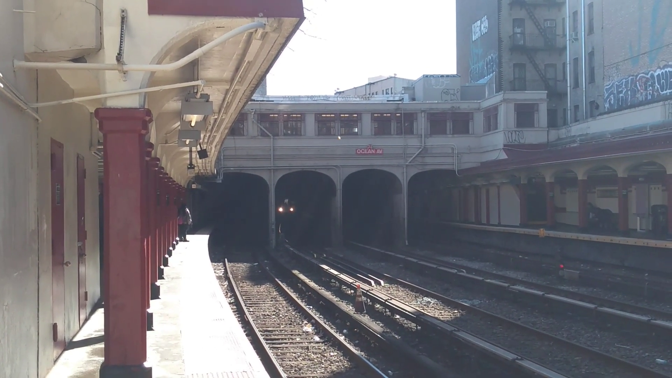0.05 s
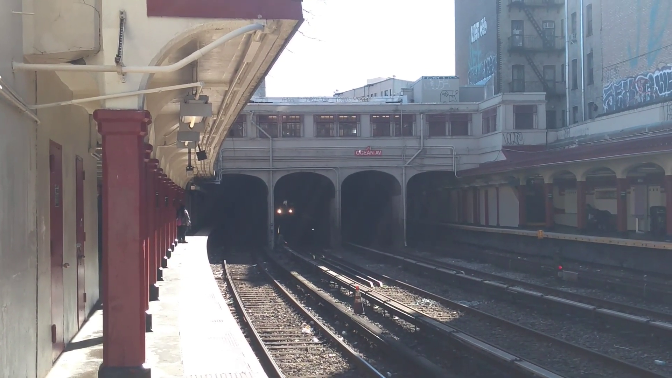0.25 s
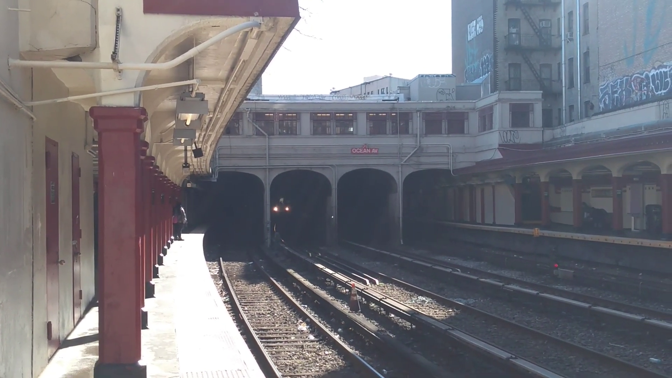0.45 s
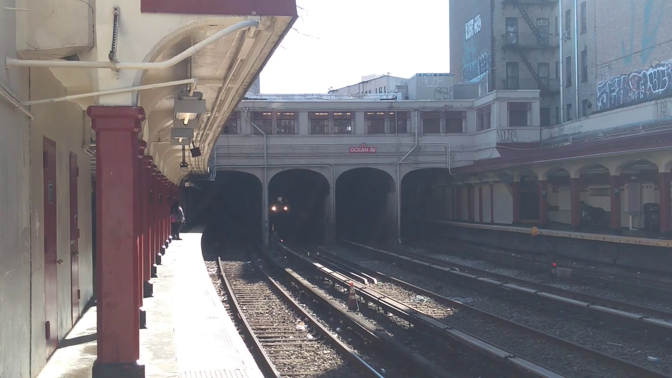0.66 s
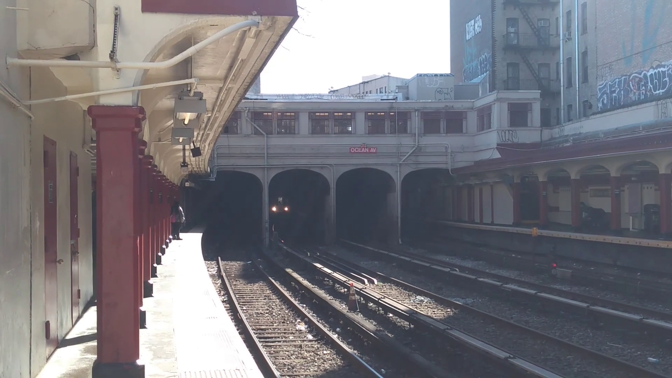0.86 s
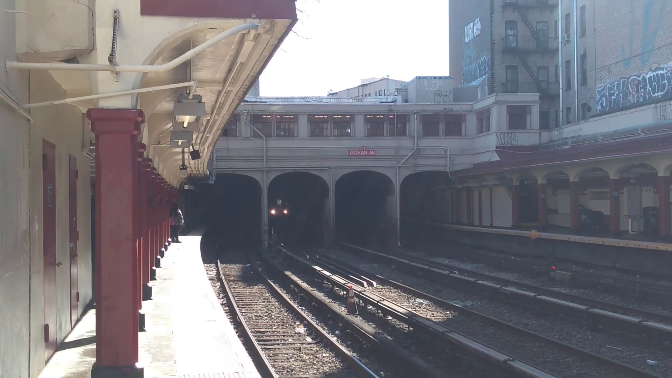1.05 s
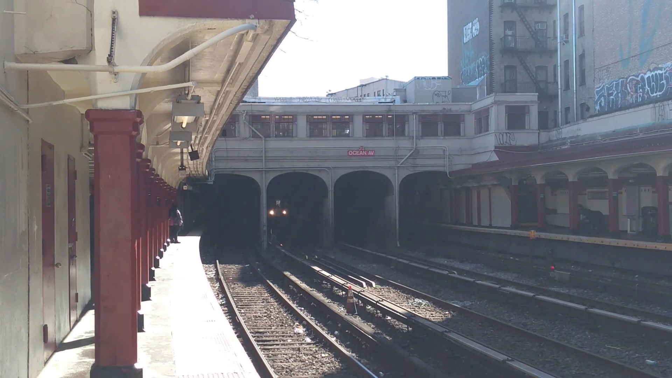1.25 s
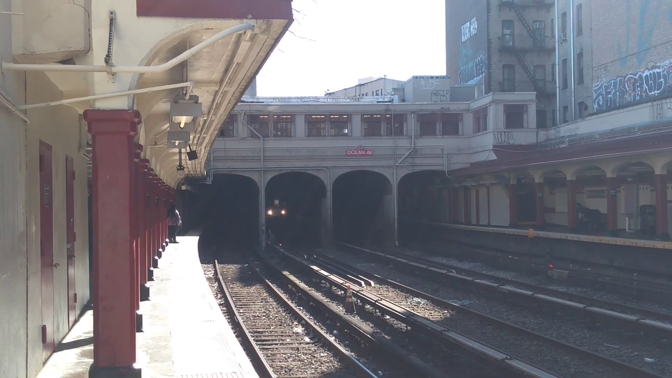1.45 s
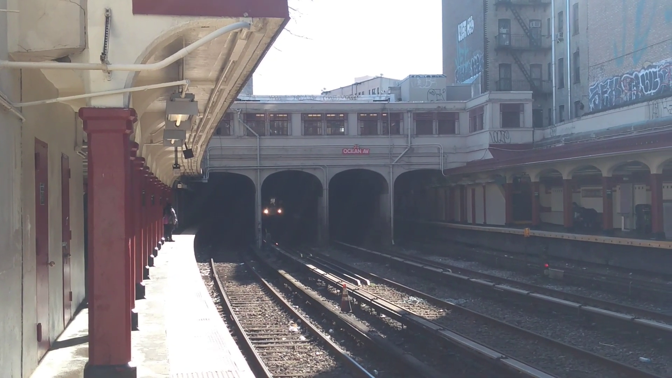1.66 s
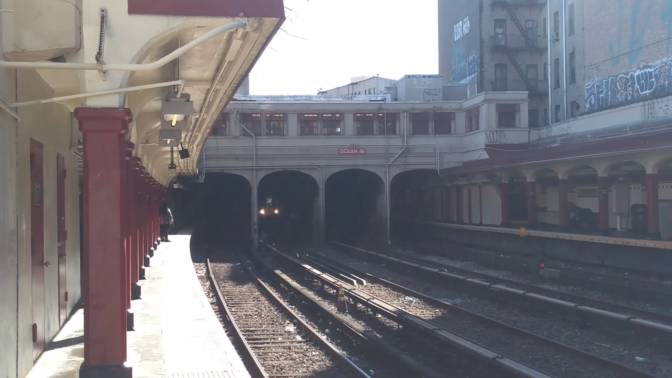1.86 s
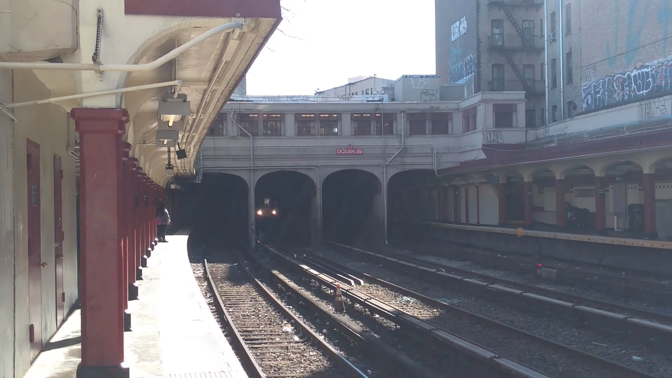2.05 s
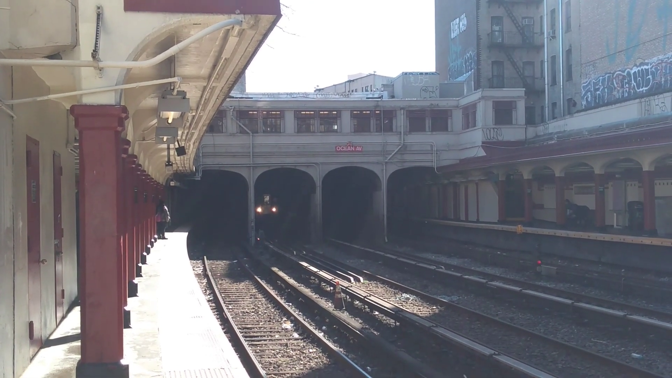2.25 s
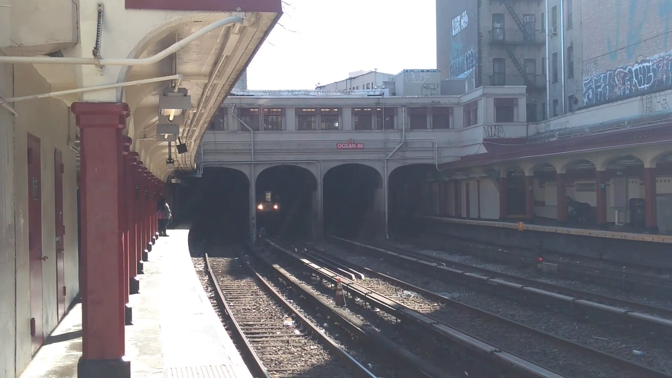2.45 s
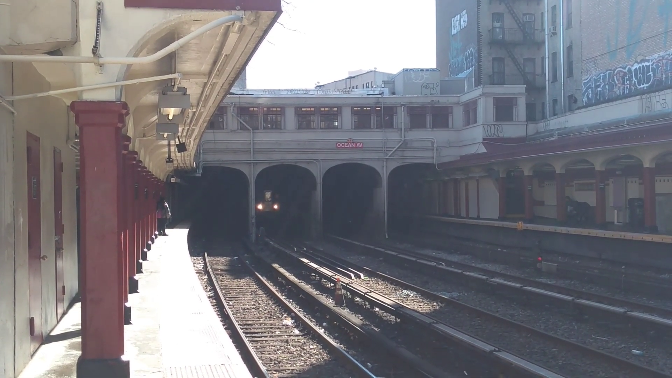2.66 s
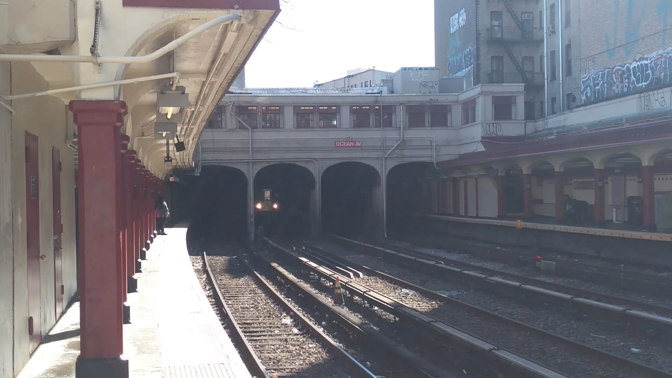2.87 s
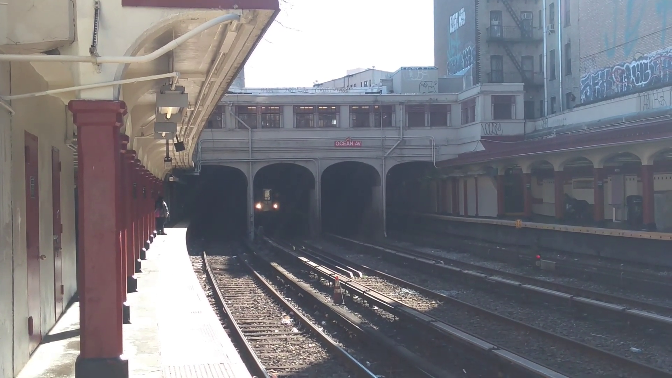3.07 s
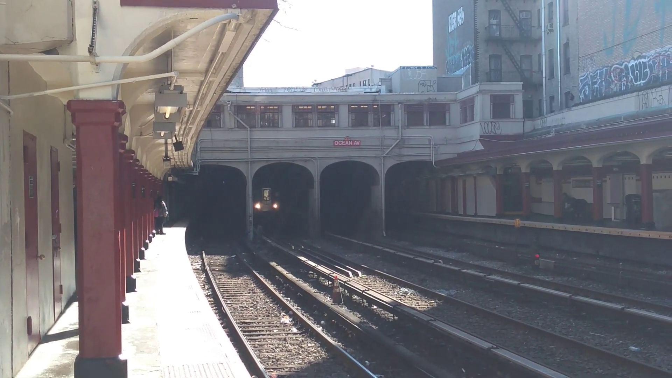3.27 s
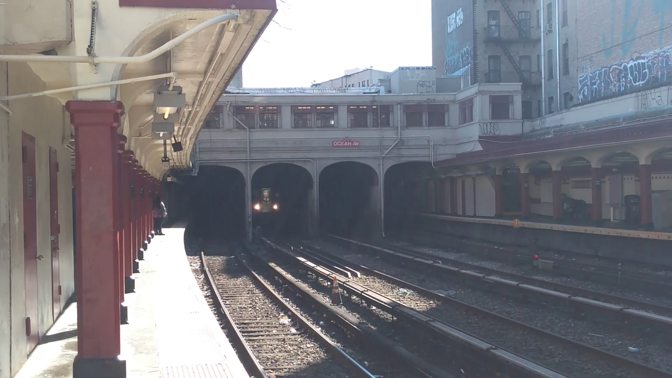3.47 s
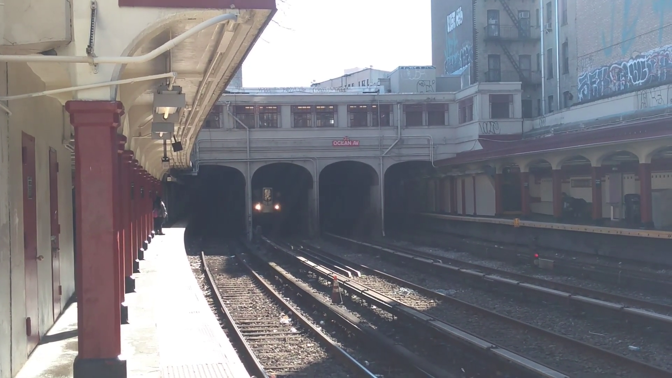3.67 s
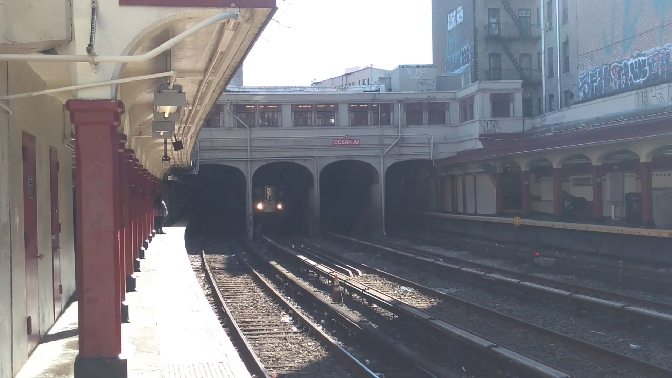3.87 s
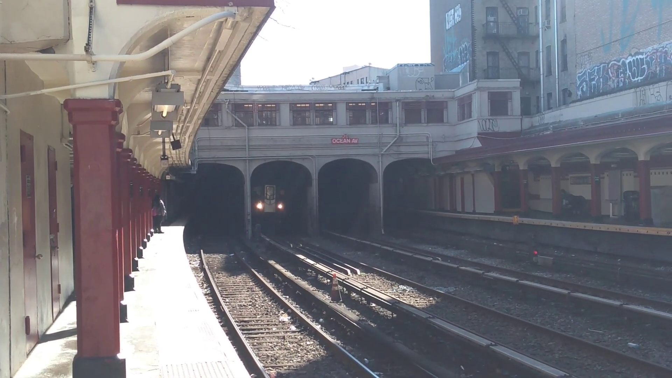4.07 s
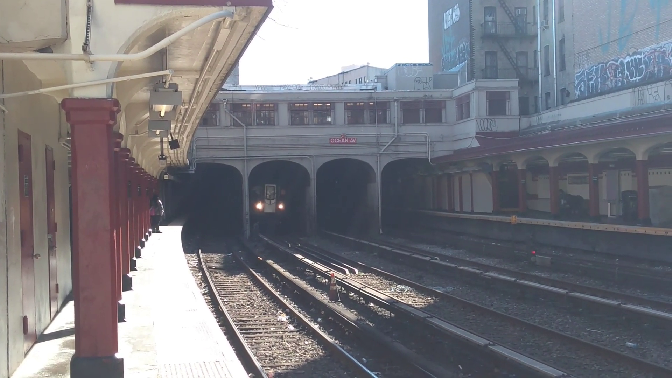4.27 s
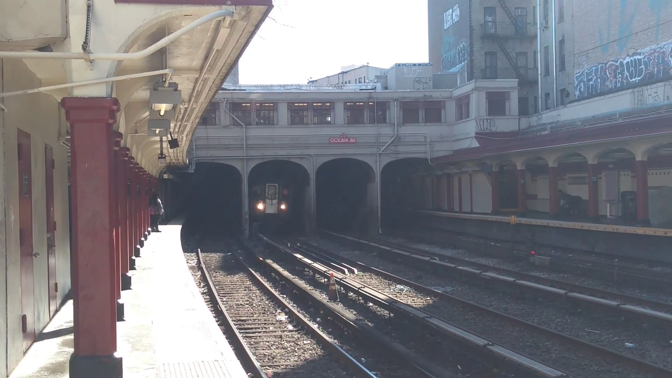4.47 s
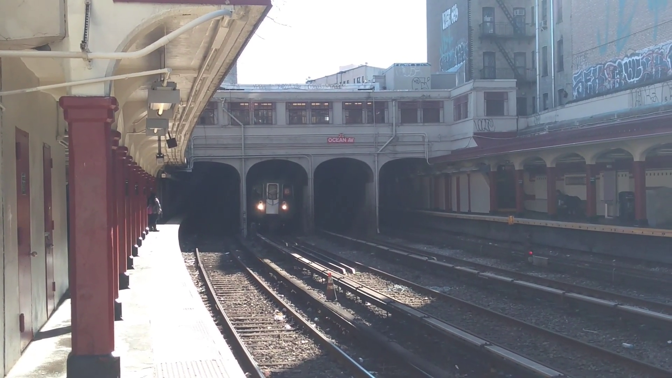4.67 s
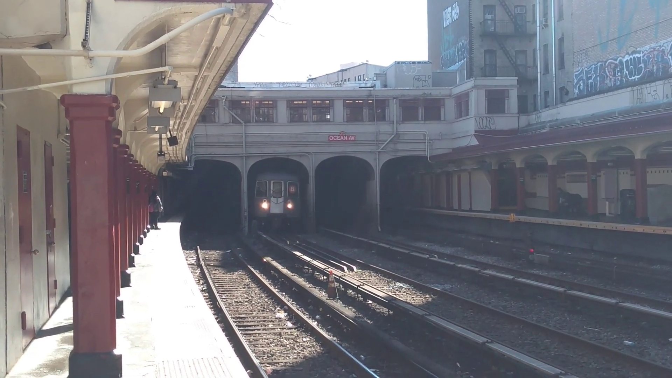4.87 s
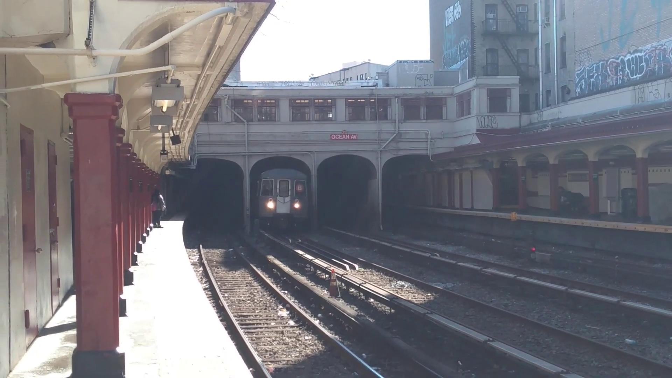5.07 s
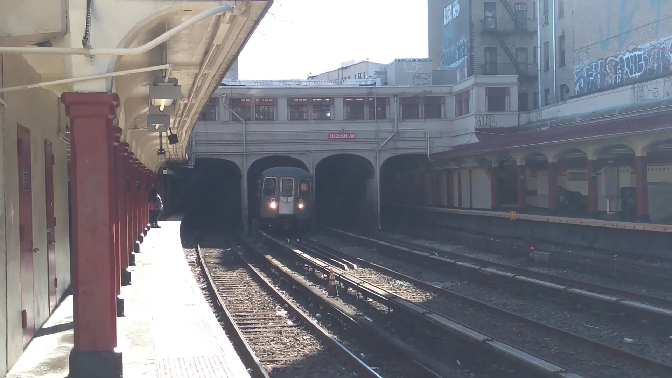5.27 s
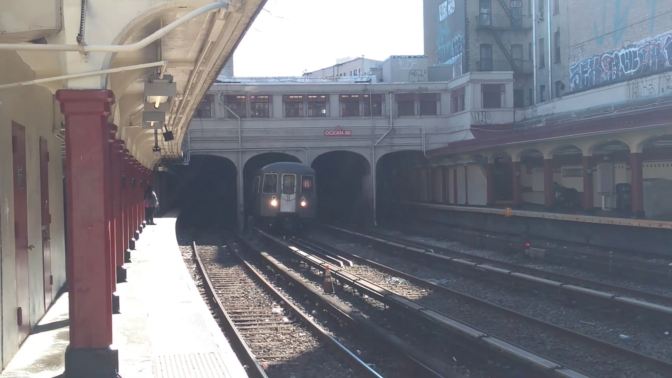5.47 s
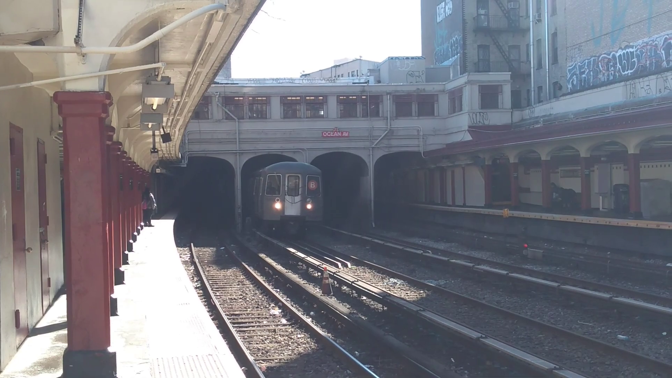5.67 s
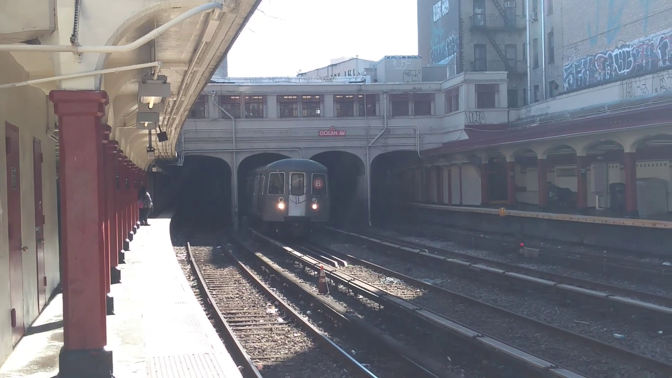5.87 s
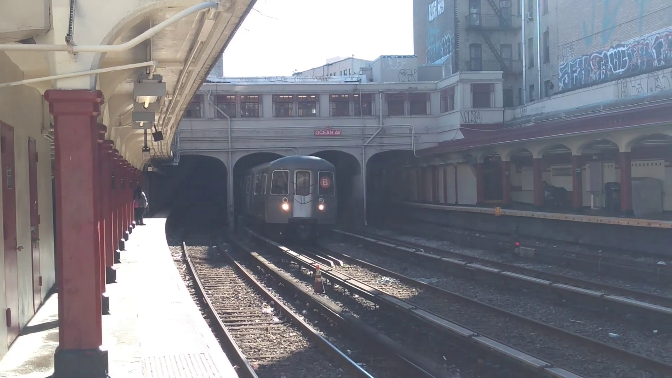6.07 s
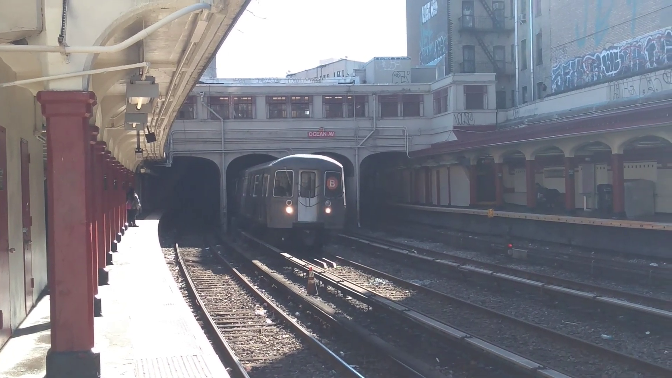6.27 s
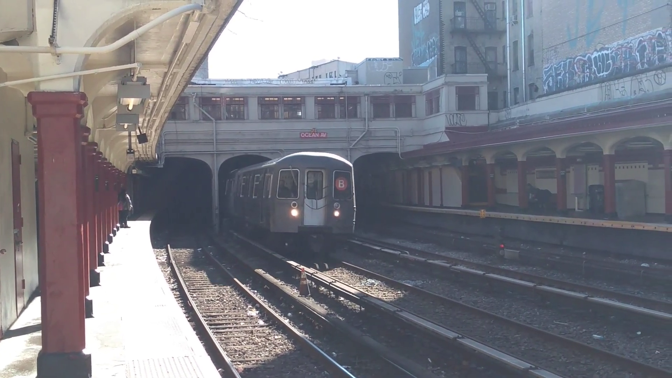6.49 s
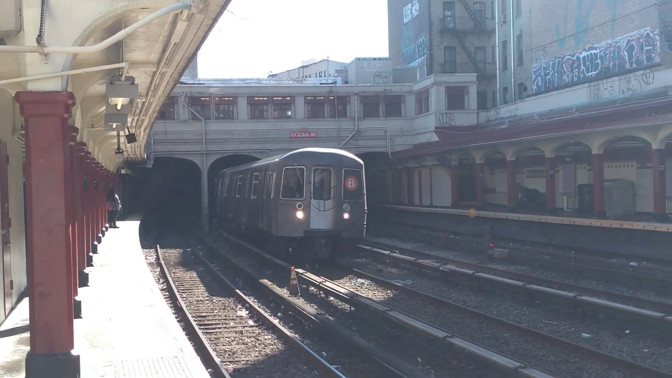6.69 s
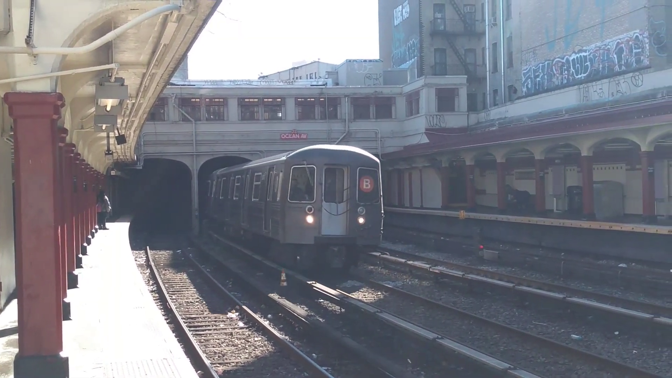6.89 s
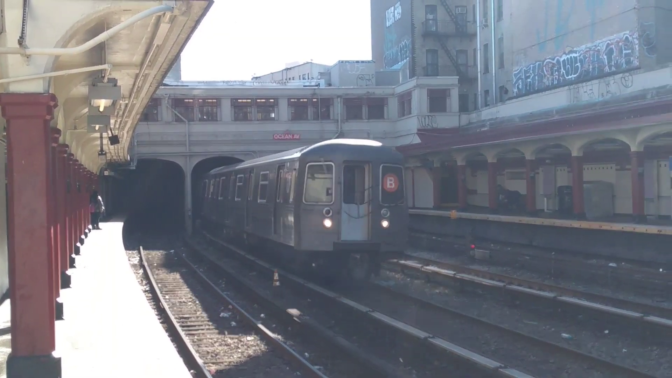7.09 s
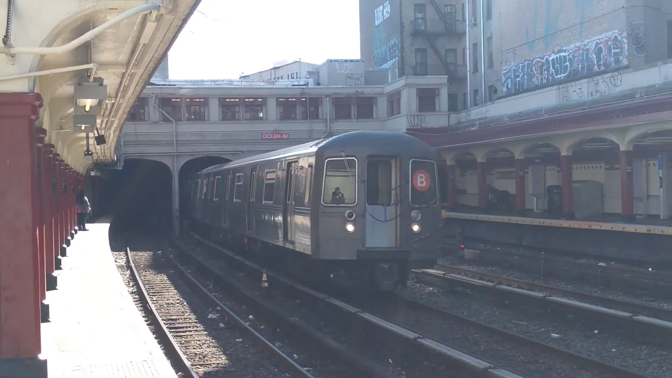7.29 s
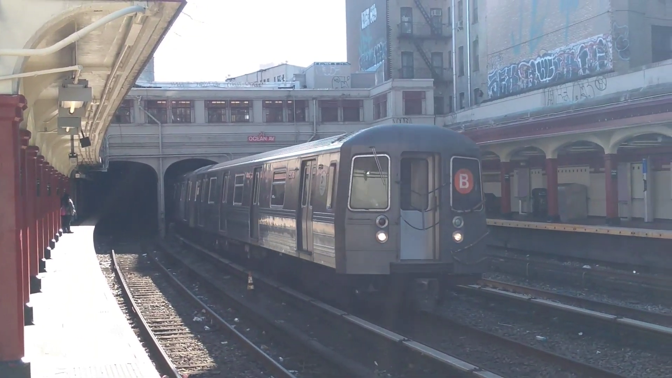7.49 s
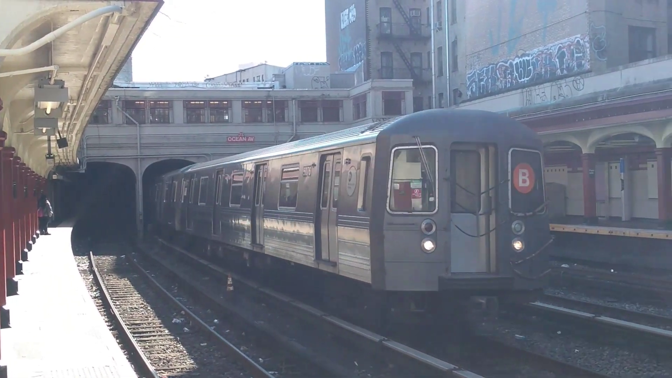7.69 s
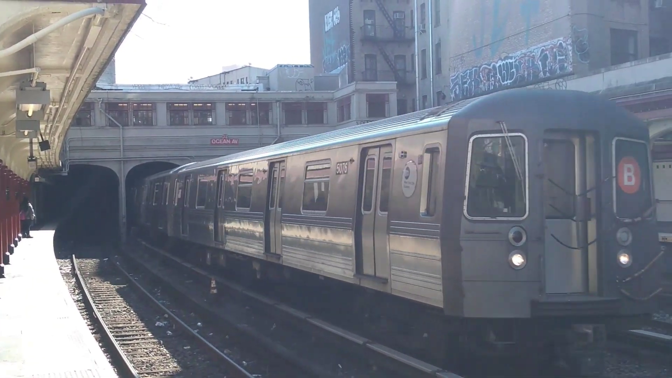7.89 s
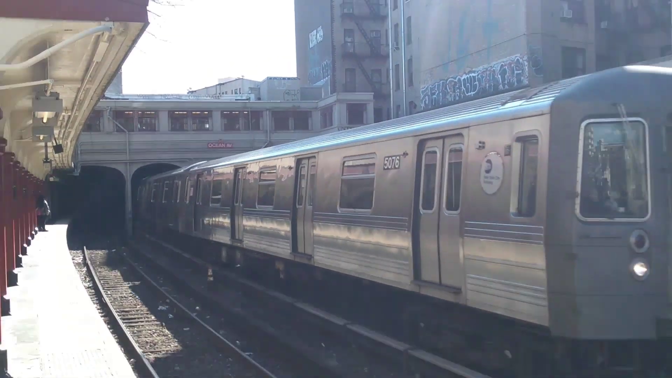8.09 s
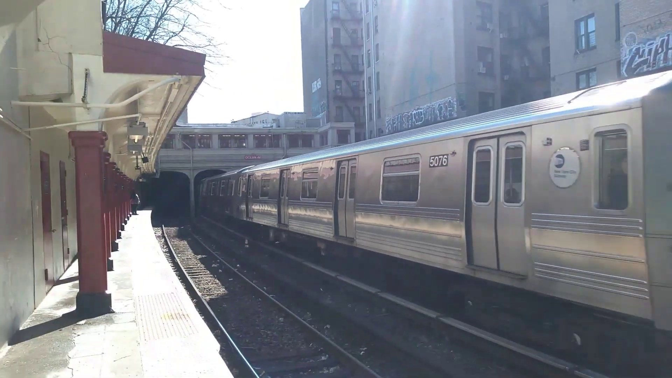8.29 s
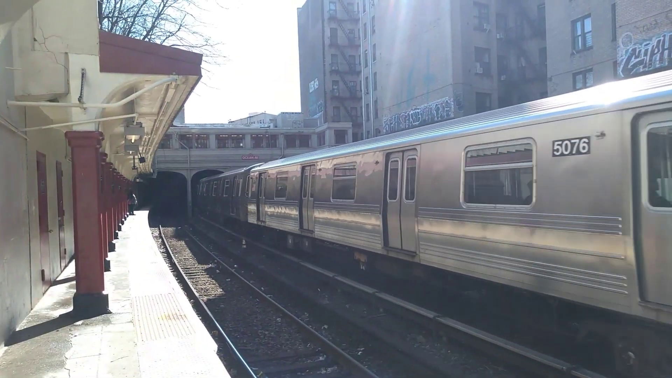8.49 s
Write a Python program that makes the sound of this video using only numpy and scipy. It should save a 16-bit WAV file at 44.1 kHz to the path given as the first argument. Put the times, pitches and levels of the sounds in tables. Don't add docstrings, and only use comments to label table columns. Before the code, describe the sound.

A subway train approaches an outdoor platform. First it is a faint, hollow rumble beneath fluttering wind bumps; then the low roar builds, bursts from the tunnel mouth with more bass and hiss, and rushes by with uneven clatter, metallic ringing and thin rubbing squeals. The handheld microphone is exposed to wind, and the sound ends at full roar without fading.

```python
import sys
import numpy as np
from scipy import signal
from scipy.fft import rfft, irfft, next_fast_len
from scipy.io import wavfile

SR = 44100
rng = np.random.default_rng(int(sys.argv[2]) if len(sys.argv) > 2 else 0)


def ratio_of_db(decibels):
    return 10 ** (np.asarray(decibels, float) / 20)


def transcribe(signal):
    frames = np.atleast_2d(signal).T
    limited = np.clip(frames, -1, 1)
    pcm = np.round(limited * 32767).astype(np.int16)
    wavfile.write(sys.argv[1], SR, pcm)


N = 376613
STEP = 64
CONTROL_S = np.arange(N // STEP + 2) * STEP / SR

# pitch_hz [Hz], near_db [dB alongside], share [of the distance loss], tunnel_db [dB], mouth_db [dB]
REGIONS = [
    (60.0, -4, 0.38, 0.5, 2),
    (125.0, -1.4, 0.77, -6, 8),
    (248, 3.0, 0.85, 5, -0.1),
    (417, 1.5, .95, -0.5, -1),
    (1000.0, 5, 1.05, -1.5, 1.5),
    (3630, 3.0, 1.102, .5, 2),
]


def unit_rms(x):
    return x / np.sqrt(np.mean(x ** 2) + 1e-20)


def bell(x, centre, span):
    return np.exp(-((x - centre) / span) ** 2 / 2)


def stretch(control):
    return np.interp(np.arange(N) / STEP, np.arange(len(control)), control)


def drift(rate_hz):
    r = np.exp(-2 * np.pi * rate_hz * STEP / SR)
    noise = rng.standard_normal(N // STEP + 2002)
    smooth = signal.lfilter([1], [1, -2 * r, r * r], noise)
    return unit_rms(smooth[2000:])


def gusts():
    # centre_s [s], length_s [s], level_db [dB rms], pitch_hz [Hz]
    eddies = [(0.034, .03, -23.5, 134), (0.066, 0.028, -18.5, 131), (.092, 0.027, -22, 79),
              (0.204, 0.041, -33, 90), (0.257, .05, -35, 60), (0.356, .04, -30, 60), (0.478, .03, -36, 180),
              (.59, .03, -29, 130), (0.669, 0.034, -26, 111), (.848, 0.021, -32, 90),
              (0.902, 0.039, -25.5, 102), (1.078, 0.065, -31, 70), (1.169, 0.032, -24, 123),
              (1.186, 0.031, -26, 119), (1.24, .05, -35, 70.4), (1.4, 0.063, -28, 133),
              (1.438, .04, -25, 120), (1.476, 0.037, -23.5, 99), (1.65, .03, -41, 110),
              (1.718, 0.052, -28, 97), (1.757, 0.023, -33, 135), (2.136, 0.032, -23, 115),
              (6.728, 0.033, -18, 119), (6.752, 0.032, -35, 93)]
    out = np.zeros(N)
    draws = rng.standard_normal((len(eddies), 8192))
    for (centre_s, length_s, level_db, hz), white in zip(eddies, draws):
        count = int(2 * length_s * SR)
        band = signal.butter(2, [hz / 1.5, hz * 1.5], "band", fs=SR, output="sos")
        body = signal.sosfilt(band, white)
        body = body / np.abs(signal.hilbert(body)) ** .8
        soften = signal.butter(3, 4 * hz, fs=SR, output="sos")
        body = signal.sosfilt(soften, body)[2048:2048 + count]
        at = max(0, int(centre_s * SR) - count // 2)
        out[at:at + count] += unit_rms(body * np.hanning(count)) * ratio_of_db(level_db - 4)
    return out


def pops():
    # crest_s [s], peak_db [dB], start_hz [Hz], end_hz [Hz], half_length_s [s]
    pushes = [(0.086, -19.5, 610, 300, 0.00086), (0.3259, -17.5, 320, 413, 0.0017),
              (0.327, -25, 655, 600, 0.001), (0.331, -8, 112, 72.6, 0.0053), (1.185, -25, 264, 205, 0.0032),
              (1.189, -12, 110, 80, 0.0042), (1.4, -24, 170, 130, 0.0047), (1.728, -23, 110, 80, .005),
              (2.136, -15.5, 190, 120, 0.0045), (2.135, -36, 500, 350, 0.0021),
              (6.675, 0, 122, 101, 0.0031)]
    out = np.zeros(N)
    for crest_s, peak_db, start_hz, end_hz, half_s in pushes:
        t = np.arange(N) / SR - crest_s
        slide = half_s * np.log(np.cosh(np.clip(t / half_s, -9, 9)))
        turns = (start_hz + end_hz) / 2 * t - (start_hz - end_hz) / 2 * slide
        out -= ratio_of_db(peak_db) * bell(t, 0, half_s) * np.cos(2 * np.pi * turns)
    return out


def approach_gains():
    # time_s [s], level_db [dB]
    approach = [(0, -23), (.5, -24), (1.1, -22), (1.8, -20.5), (2.3, -20), (3, -18.5), (3.9, -17.5),
                (4.3, -16), (4.9, -15), (5.5, -13), (6, -11.5), (6.5, -11.5), (7, -7), (7.4, -5.5),
                (7.8, -2), (8.15, -0.5), (8.35, -0.5), (8.54, 0)]
    loss = np.interp(CONTROL_S, *np.transpose(approach))
    inside = bell(CONTROL_S, 4.3, 1.73)
    mouth = bell(CONTROL_S, 6.24, 0.43)
    return [near_db + share * loss + tunnel_db * inside + mouth_db * mouth
            for hz, near_db, share, tunnel_db, mouth_db in REGIONS]


def band_gain_db(gains, hz):
    air_loss = 0.2
    place = np.interp(np.log(hz), np.log([r[0] for r in REGIONS]), np.arange(len(REGIONS)))
    low = min(int(place), len(REGIONS) - 2)
    blend = gains[low] + (place - low) * (gains[low + 1] - gains[low])
    return blend * (1 + air_loss * max(0, np.log2(hz / REGIONS[-1][0])))


def surge_db(hz):
    # centre_s [s], length_s [s], level_db [dB], pitch_hz [Hz]
    surges = [(0.497, .06, -4, 100), (1.216, 0.02, 3.5, 1200), (1.45, 0.049, 4, 3500), (1.9, 0.074, -6, 65),
              (2.187, 0.03, 2.5, 600), (2.377, 0.028, 5, 696), (2.52, 0.047, -7, 65), (3.047, 0.045, 1, 60),
              (3.65, 0.21, 3, 220), (4.254, 0.065, 2, 900), (4.45, 0.13, 2, 100), (4.468, 0.035, -5, 258),
              (5.353, 0.095, -2, 70), (5.703, 0.045, 5, 75), (5.836, 0.22, 3, 5200), (6.0, 0.046, -3, 65),
              (6.183, 0.028, -3.5, 250), (6.3, .06, 4, 75), (6.373, 0.055, 2.5, 3520),
              (6.56, 0.067, 1.5, 675), (6.9, 0.13, -3, 130), (7.034, 0.074, 4, 298),
              (7.15, .25, 2.5, 12000), (7.2, 0.26, 2.5, 2800), (7.68, 0.094, 7.5, 70),
              (7.977, 0.072, -0.5, 180), (8.108, .04, -4.5, 150), (8.204, 0.11, 6, 170),
              (8.3, 0.017, -5.5, 850), (8.45, 0.017, 2.5, 500)]
    octaves = 0.78
    return sum(db * bell(CONTROL_S, centre_s, length_s) * bell(np.log2(hz / centre_hz), 0, octaves)
               for centre_s, length_s, db, centre_hz in surges)


def train(level_db, patchy_db, jolt_db):
    # pitch_hz [Hz], level_db [dB per Hz]
    alongside = [(40, -3.5), (55, 2), (90, -4.5), (140, 1.5), (200, -1), (300, -6), (550, -10.5),
                 (850, -16), (1200, -19.5), (2400, -30.5), (4500, -38.5), (7500, -44), (10000, -48.5),
                 (12000, -61.5), (14200, -63)]
    # pitch_hz [Hz], width_hz [Hz], far_db [dB over the roar], near_db [dB over it]
    ringing = [(714, 193, 7.5, 2.5), (781, 41, 0, 5.5), (1166, 193, 1.5, -4.5), (1618, 147, 7.5, 2.5),
               (2072, 180, 9, 5.5), (2884, 140, 6, 5.5), (3240, 55, 2, -13.5), (4000, 520, 3.5, 1.5),
               (6470, 340, 1.5, 4), (12900, 2700, -8, 7)]
    size = next_fast_len(N)
    hz = np.maximum(np.arange(size // 2 + 1) * SR / size, 1)
    table_hz, table_db = np.transpose(alongside)
    roar = rfft(rng.standard_normal(size)) * ratio_of_db(np.interp(np.log(hz), np.log(table_hz), table_db))
    far, near = np.zeros((2, len(hz)))
    for centre_hz, width_hz, far_db, near_db in ringing:
        bump = np.exp(-2 * ((hz - centre_hz) / width_hz) ** 2)
        far += far_db * bump
        near += near_db * bump
    gains = approach_gains()
    nearness = stretch(np.clip(1 + gains[-2] / 15.0, 0, 1))
    clatter = 1 + 0.24 * np.clip(1 + gains[-2] / 4.8, 0, 1)
    jolts = .6 * drift(6) + .8 * drift(16)
    out, shared = np.zeros(N), drift(8.0)
    thirds = 3 * np.log2(hz / 20)
    for k in range(30):
        band_hz = 20 * 2 ** (k / 3)
        band = roar * np.cos(np.pi / 2 * np.clip(thirds - k, -1, 1)) ** 2
        distant, close = irfft(band * ratio_of_db([far, near]), size)[:, :N]
        shared = .6 * shared + .8 * drift(7)
        wobble = (jolt_db * jolts * np.exp(-k / 14) + patchy_db * shared) * clatter
        gain = stretch(ratio_of_db(band_gain_db(gains, band_hz) + surge_db(band_hz) + wobble))
        out += gain * (distant + nearness * (close - distant))
    return ratio_of_db(level_db) * out


def strands():
    level_db, width_hz, swing_db = -59, 45, 6
    white = rng.standard_normal(N)
    r = np.exp(-np.pi * width_hz / SR)
    lines = np.zeros(N)
    for hz in np.linspace(2450, 3100, 11) + rng.uniform(-40, 40, 11):
        tone = signal.lfilter([1, 0, -1], [1, -2 * r * np.cos(2 * np.pi * hz / SR), r * r], white)
        lines += unit_rms(tone) * stretch(ratio_of_db(swing_db * np.minimum(drift(1.5), 1.5)))
    return ratio_of_db(level_db) * stretch(ratio_of_db(approach_gains()[-1])) * lines


def squeals():
    # centre_s [s], length_s [s], level_db [dB rms], pitch_hz [Hz], width_hz [Hz]
    rubs = [(2.62, .2, -67, 3345, 50), (5.9, .15, -56, 7000, 1600), (6.37, .08, -53, 5000, 900),
            (6.38, .09, -50, 2720, 220), (6.82, .12, -51, 2690, 70), (5.45, .25, -55, 2900, 400),
            (8.13, .07, -41, 2400, 90), (8.27, .18, -43, 2500, 60), (7.22, .15, -48, 2700, 80),
            (7.08, .05, -48, 2540, 80), (7.97, .18, -47, 3010, 150), (6.54, .12, -51, 2980, 70)]
    out, t = np.zeros(N), np.arange(N) / SR
    white = rng.standard_normal(N)
    for centre_s, length_s, level_db, hz, width_hz in rubs:
        band = signal.butter(2, [hz - width_hz / 2, hz + width_hz / 2], "band", fs=SR, output="sos")
        narrow = unit_rms(signal.sosfilt(band, white))
        swell = np.exp(-2 * ((t - centre_s) / length_s) ** 2)
        catch_and_slip = stretch(ratio_of_db(2 * drift(12)))
        out += ratio_of_db(level_db) * swell * narrow * catch_and_slip
    return out


def scene():
    wind = gusts() + pops()
    wheels = train(level_db=3.5, patchy_db=0.5, jolt_db=2.7) + strands() + ratio_of_db(-1.2) * squeals()
    hiss = ratio_of_db(-76.0) * rng.standard_normal(N)
    mono = wind + wheels + hiss
    return np.array([mono, mono])


def late_copy(mono):
    # pitch_hz [Hz], share [of power], loss_db [dB]
    kept = [(600, 1, 0), (1500, .95, 0), (2500, .87, 0), (3500, .73, -.3), (4600, .5, 0), (7000, .3, -.3),
            (8500, .15, -.5), (14000, .1, -2.5)]
    lag, level_db = 21, -1.75
    size = next_fast_len(N + 4096)
    between = np.r_[np.zeros(lag), .5, .5]
    late = np.pad(np.convolve(mono, between)[:N], (0, size - N), "linear_ramp")
    hz, share, loss_db = np.transpose(kept)
    bins = np.arange(size // 2 + 1) * SR / size
    share, loss = np.interp(bins, hz, share), ratio_of_db(np.interp(bins, hz, loss_db))
    other = np.roll(late, 1500)
    other = np.roll(rfft(other, size), 300)
    mixed = np.sqrt(share) * rfft(late, size) + np.sqrt(1 - share) * other
    return -ratio_of_db(level_db) * irfft(loss * mixed, size)[:N]


def flicker(chance, share, times):
    chance = np.interp(times * SR / STEP, np.arange(len(chance)), chance)
    return 1. * (chance < np.quantile(chance, share))


def drop_weak_bands(left, right):
    # low_hz [Hz], high_hz [Hz], sign [+1 sum, -1 difference], share [of time]
    cancelling = [(1930, 2170, 1, .24), (2950, 3200, -1, .4), (3900, 4300, 1, .85), (4850, 5400, -1, .75),
                  (5700, 6400, 1, .65), (6850, 7550, -1, .8), (7800, 8500, 1, .3), (8950, 9450, -1, .5),
                  (10000, 10600, 1, .6)]
    # pitch_hz [Hz], left_share [of time], right_share [of time]
    empty_top = [(7500, .05, .02), (9500, .25, .12), (11000, .42, .3), (14300, .4, .3)]
    bins, times, frames = signal.stft([left, right], SR, nperseg=16 * STEP, noverlap=12 * STEP,
                                      boundary="even")
    fuller = approach_gains()[-1] / 16
    for low, high, sign, share in cancelling:
        whole, edges = 1.3 * drift(9), np.linspace(low, high, 4)
        for strip, often in enumerate([.75 * share, share, .75 * share]):
            rows = (bins > edges[strip]) & (bins <= edges[strip + 1])
            off = flicker(whole + drift(15.0) + fuller * (low > 7500), often, times)
            weak = off * (frames[0, rows] + sign * frames[1, rows]) / 2
            frames[:, rows] -= np.array([weak, sign * weak])
    hz, *shares = np.transpose(empty_top)
    for low in np.arange(hz[0], hz[-1], 260):
        rows = (bins > low) & (bins <= low + 260)
        for channel, share in enumerate(shares):
            off = flicker(drift(16.0) + fuller, np.interp(low, hz, share), times)
            frames[channel, rows] *= 1 - off
    return signal.istft(frames, SR, nperseg=16 * STEP, noverlap=12 * STEP)[1][:, :N]


def low_pass(x):
    return signal.sosfilt(signal.butter(12, 14190, fs=SR, output="sos"), x)


def record(dry):
    mono = signal.sosfilt(signal.butter(3, 46.0, "high", fs=SR, output="sos"), dry[0])
    mono = mono * np.minimum(np.arange(N) / 60, 1)
    mono = mono / (1 + (mono / .92) ** 6) ** (1 / 6)
    mix = drop_weak_bands(late_copy(mono), mono)
    return low_pass(mix)


dry = scene()
out = record(dry)
transcribe(out)
```